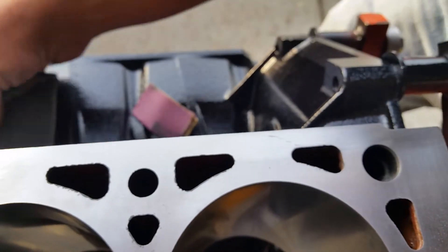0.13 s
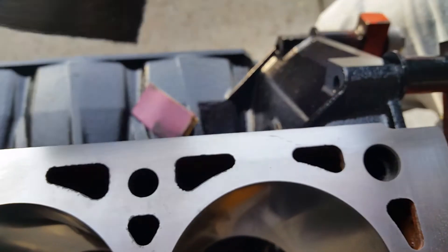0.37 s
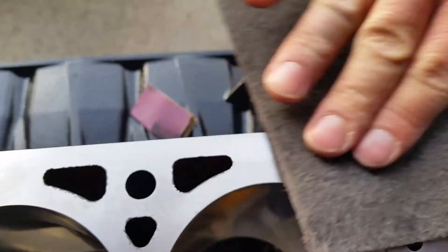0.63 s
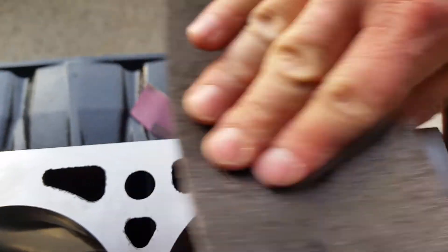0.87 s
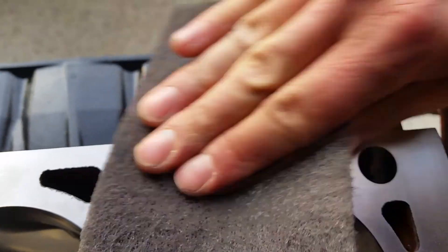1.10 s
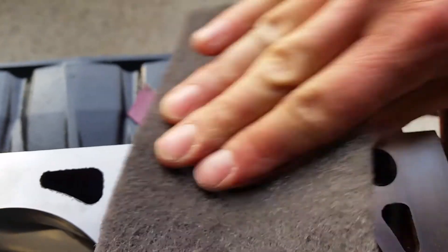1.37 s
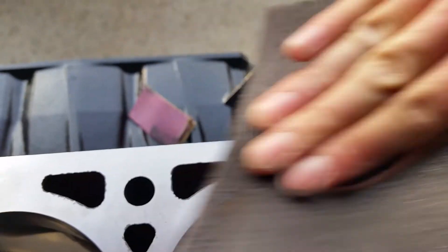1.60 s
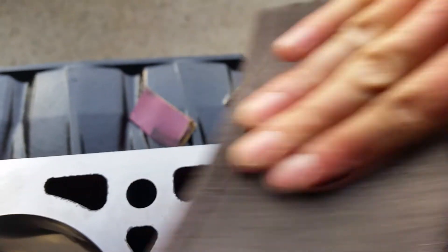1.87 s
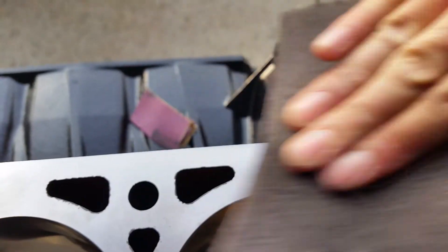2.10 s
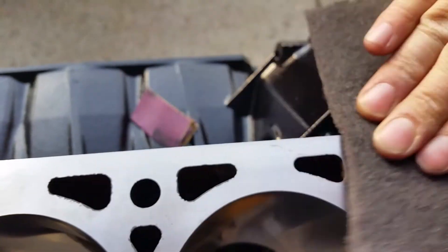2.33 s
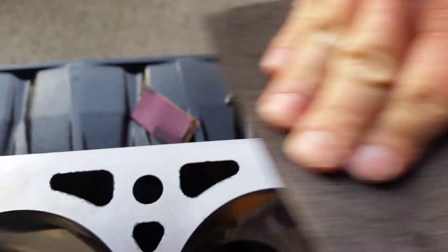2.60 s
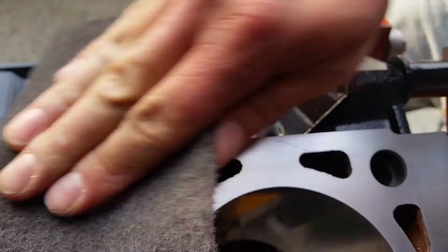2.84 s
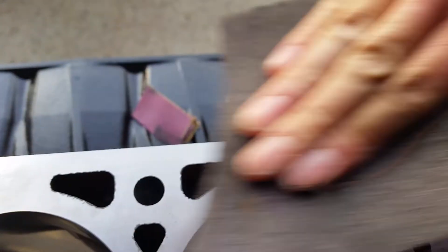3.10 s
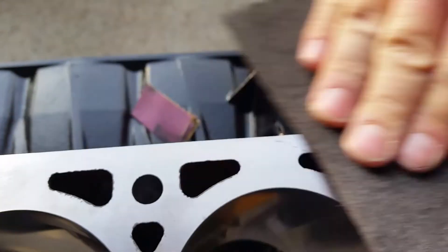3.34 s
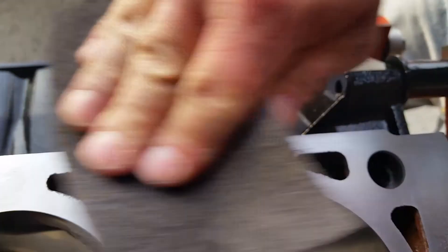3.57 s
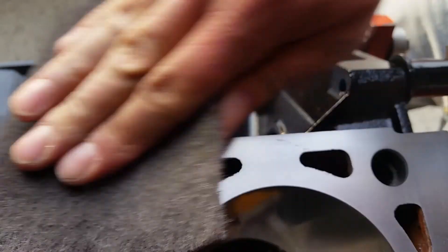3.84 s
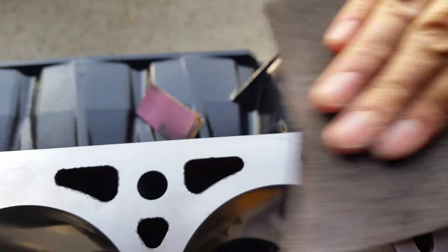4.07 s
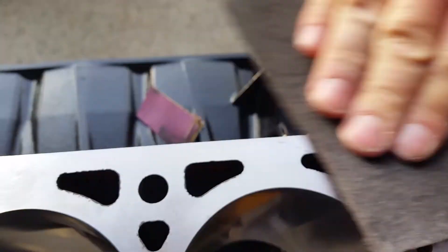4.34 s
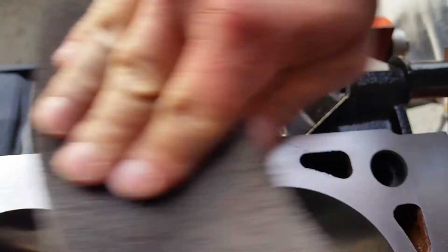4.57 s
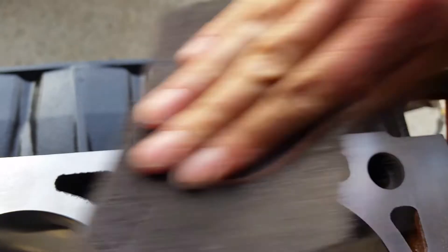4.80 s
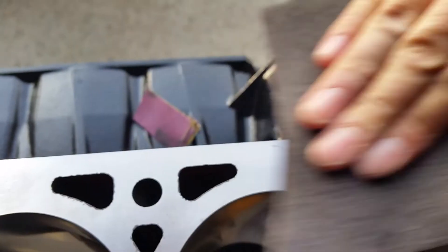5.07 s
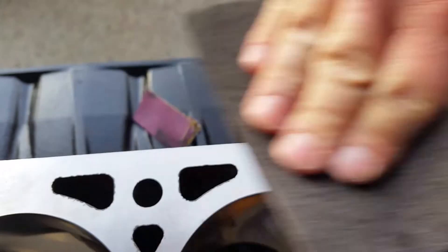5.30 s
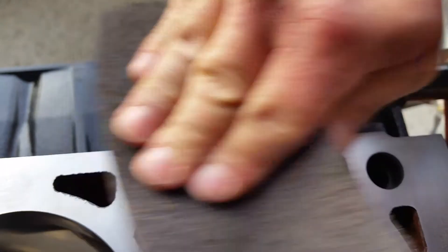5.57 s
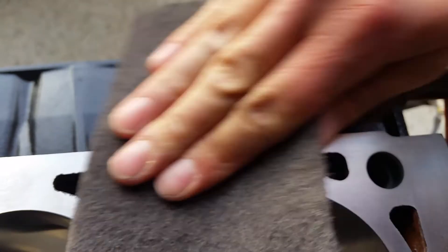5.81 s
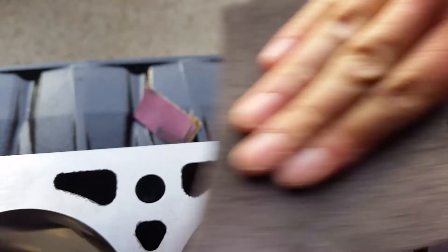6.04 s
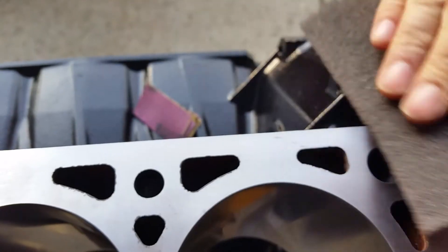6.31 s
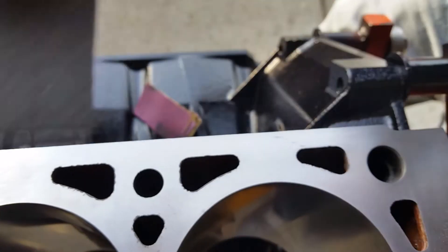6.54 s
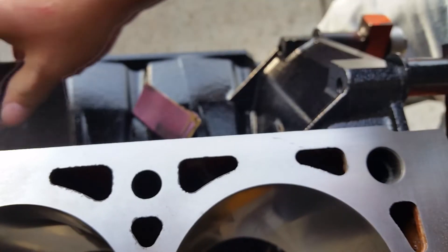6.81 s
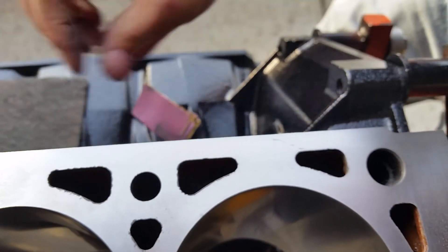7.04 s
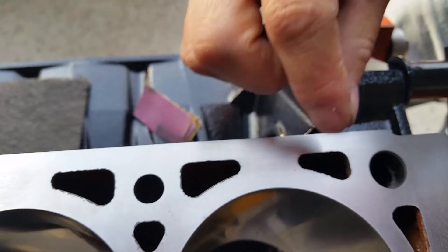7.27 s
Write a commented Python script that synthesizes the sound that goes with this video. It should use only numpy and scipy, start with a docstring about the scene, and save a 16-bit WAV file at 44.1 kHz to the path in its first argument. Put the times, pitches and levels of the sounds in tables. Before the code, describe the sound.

Close, dry stereo sound of hand sanding on metal in a workshop. A small part knocks and rattles first, then the pad starts gently and swells into steady, crisp back-and-forth scraping with a thin metallic ring, occasional sharp fibre snaps and short hollow resonances from openings. After nearly six seconds it lifts off, leaving light brushing, low rumble, soft hums and a faint hiss on the left.

```python
"""A soft low bump, a light brush and a metal clank come first, over the low rumble of a workshop.
Then a hand scrubs a fibre abrasive pad back and forth over the machined face of an engine block, up close.
Grit scratches brightly (shaped noise), the block rings under it (resonators driven by grit),
and an open bore booms as the pad crosses it (resonant air). Hums and a hiss on the left fill the workshop."""
import sys
import numpy as np
from scipy import signal
from scipy.fft import rfft, irfft
from scipy.io import wavfile
from scipy.ndimage import uniform_filter1d

SR = 44100
rng = np.random.default_rng(int(sys.argv[2]) if len(sys.argv) > 2 else 0)


def master_out(mix):
    """Clip the mix to full scale and print it as 16-bit PCM to the path in sys.argv[1]."""
    frames = np.transpose(np.atleast_2d(mix))
    ceiling = np.clip(frames, -1, 1)
    pcm = np.round(ceiling * 32767).astype(np.int16)
    wavfile.write(sys.argv[1], SR, pcm)


def invert_db(x):
    """Field ratio 10**(x/20) for x, a level in decibels (scalar or array-like)."""
    u = np.asarray(x, float) / 20
    return 10 ** u


N = 326719
T = np.arange(N) / SR
TOP_HZ = 15900  # upper end of the sound


def evened(x):
    """Scales to rms 1, over all channels together."""
    return x / np.sqrt(np.mean(x ** 2))


def read(points, hz):
    """Reads every column of a spectrum at hz, along a log frequency axis."""
    f, *columns = np.transpose(points)
    return np.array([np.interp(np.log(hz + 1), np.log(f + 1), c) for c in columns])


def wander(rate_hz, channels):
    """Slow chance of rms 1: noise smoothed down to rate_hz."""
    size = 2 ** 19
    spectrum = rfft(rng.standard_normal((channels, size)))
    spectrum = spectrum / (1 + (np.fft.rfftfreq(size, 1 / SR) / rate_hz) ** 2)
    return evened(irfft(spectrum)[:, :N])


def bumps(events, width_s):
    """Sums a smooth bump in dB at each (s, dB) event."""
    return sum(db * np.exp(-((T - s) / width_s) ** 2) for s, db in events)


def resonate(x, hz, width):
    """A fixed resonance of gain about 1 at its peak; width in Hz."""
    r = np.exp(-np.pi * width / SR)
    pole = r * np.exp(2j * np.pi * hz / SR)
    return 2 * signal.lfilter([1 - r], [1, -pole], x).real


def grit(spread_db, channels):
    """Dense scratches of random sign; a few grains bite harder."""
    bite = np.minimum(rng.exponential(1, (channels, N)), 5)
    return evened(rng.standard_normal((channels, N)) * invert_db(spread_db * bite))


def coloured(x, ears, patchy_db):
    """Colour at each microphone port, with patches that drift as the hand shades the sound."""
    hz, _, z = signal.stft(x, SR, nperseg=512)
    patches = uniform_filter1d(rng.standard_normal(z.shape), 8, axis=1)
    patches = evened(uniform_filter1d(patches, 8, axis=2))
    patches += patches[:1]  # partly shared by both ports
    colour = invert_db(read(ears, hz)) * (hz < TOP_HZ)
    z = z * colour[..., None] * invert_db(patchy_db * patches)
    return evened(signal.istft(z, SR, nperseg=512)[1][:, :N])


# The strokes of the pad from turn to turn, away and back alternately.
# Each row: start in seconds, scratch level early in the stroke in dB, scratch level late in dB, block ring in dB.
STROKE_ROWS = [(0.596, -44.5, -39.5, -53.5), (0.787, -38, -34.5, -48.5), (0.925, -33.5, -28.5, -44.5),
               (1.08, -31.5, -31, -43), (1.222, -31, -30, -41.5), (1.363, -31, -33.5, -41.5),
               (1.488, -32.5, -30.5, -42.5), (1.624, -31, -34, -42), (1.76, -33.5, -31, -43),
               (1.898, -29.5, -35.5, -43.5), (2.029, -32.5, -30.5, -41), (2.157, -33, -30, -44.5),
               (2.29, -30.5, -29.5, -41), (2.428, -30.5, -27.5, -39), (2.594, -27, -29.5, -38),
               (2.768, -36, -30, -43), (2.957, -29, -28, -40.5), (3.132, -29.5, -28, -40.5),
               (3.306, -29.5, -31.5, -40.5), (3.468, -30, -30, -44), (3.627, -32, -33.5, -47.5),
               (3.788, -32, -33.5, -47.5), (3.957, -34, -34, -51.5), (4.121, -34.5, -36, -47),
               (4.298, -33, -33.5, -46), (4.463, -31, -30, -42.5), (4.629, -29.5, -30.5, -42),
               (4.8, -32.5, -32, -46), (4.958, -29, -34.5, -45), (5.119, -30.5, -29.5, -41),
               (5.295, -31.5, -31, -43), (5.464, -31.5, -28, -41.5), (5.622, -30.5, -32, -42),
               (5.784, -32, -32, -43.5), (5.928, -33, -32, -43), (6.076, -32.5, -34, -48),
               (6.203, -32, -32.5, -43.5)]


def strokes():
    """Hand speed 0-1, zero at every turn; scratch, lean and ring in dB; nearness to the thin wall 0-1."""
    lift_s = 6.385  # the pad leaves the metal
    ease_s, ease_to_db = 0.068, -37  # the hand eases off before the lift
    set_off = 0.93  # below 1, the hand sets off faster than it slows
    ring_follows = 1  # dB of ring for each dB that the scratch swells within a stroke
    free_end_db = 0.5  # the block rings more toward one end of the travel
    lean_away_db, lean_back_db = -2.5, 0  # left minus right
    sag_at, sag_width = 0.53, 0.1  # shares of a stroke
    sag_away_db, sag_back_db, scratch_share = -4, -7, 0.33  # full sag is for the ring
    wall_away, wall_back, wall_width = 0.82, 0.22, 0.17  # shares of a stroke

    start, early_db, late_db, ring_db = np.transpose(STROKE_ROWS)
    turns = np.append(start, lift_s)
    length = np.diff(turns)
    travel = np.interp(T, turns, np.arange(len(turns)))
    done = travel % 1
    going = travel % 2 < 1
    speed = np.sin(np.pi * done ** set_off)

    away = np.arange(len(start)) % 2 == 0
    end_db = np.where(away, free_end_db, -free_end_db)
    swell_db = (ring_follows * (late_db - early_db) + end_db) / 2
    knots = np.ravel(start + np.outer([.3, .65], length), "F")  # early and late point of each stroke
    ease_db = np.interp(T, [lift_s - ease_s, lift_s], [0, ease_to_db])

    def glide(early, late):
        return ease_db + np.interp(T, knots, np.ravel([early, late], "F"))

    # the ring sags where the pad spans the open bore, and the scratch a little
    sag_db = np.where(going, sag_away_db, sag_back_db) * np.exp(-((done - sag_at) / sag_width) ** 2)
    scratch = glide(early_db, late_db) + scratch_share * sag_db
    ring = glide(ring_db - swell_db, ring_db + swell_db) + sag_db
    lean = np.interp(T, start + length / 2, np.where(away, lean_away_db, lean_back_db))
    wall = np.exp(-((done - np.where(going, wall_away, wall_back)) / wall_width) ** 2)
    return speed, scratch, lean, ring, wall


# The pad brushes lightly before and after the scrubbing.
# Each row: time in seconds, relative level in dB.
LIGHT_BRUSH = [(.125, -63), (.142, -56), (.165, -66.5), (.44, -61.5), (.47, -69), (.52, -70), (.528, -64.5),
               (6.33, -60.5), (6.53, -64.5), (6.58, -69.5), (6.85, -100)]
# The pad bites on a rim and the grit digs in for a moment.
# Each row: time in seconds, rise over the ring in dB.
RIM_BITES = [(.7, 10.5), (.853, 10.5), (1.691, 7), (2.798, 8.5), (2.899, 4.5), (4.355, 4), (4.57, 5),
             (4.679, 2), (5.343, 2)]


def scrub():
    """Fibres snag in short clumps; one hand motion drives the fibres, the block and the bore."""
    speed, scratch_db, lean_db, ring_db, wall = strokes()
    clumps_db = 1.5 * wander(400, channels=1)
    snags_db = clumps_db + 1.07 * wander(29, channels=1) + 0.64 * wander(33.8, channels=2)
    bites_db = bumps(RIM_BITES, width_s=0.02)
    touch_db = np.interp(T, *np.transpose(LIGHT_BRUSH)) + 0.53 * snags_db

    scratch_db = scratch_db + snags_db + 0.94 * bites_db + lean_db * [[.5], [-.5]]
    scratch = fibres(speed, scratch_db, touch_db)
    ring = block(speed, ring_db + bites_db + 0.69 * snags_db, touch_db, wall)
    return scratch + ring + bore(speed, ring_db, touch_db)


# A fibre catches on an edge and snaps free.
# Each row: time in seconds, rise over the scratch in dB.
FIBRE_SNAPS = [(.950, 10), (2.175, 1.5), (3.368, 8), (3.8142, 9), (4.1567, 15), (4.4757, 8), (4.984, 15),
               (5.414, 8), (5.7268, 6)]
# Colour at the microphone ports: first the spectrum of the block, then that of the fibres.
# Each row: frequency in Hz, relative left level in dB, relative right level in dB.
PORT_COLOURS = [
    [(310, -15.5, -20.5), (1050, -24, -20), (1380, -15.5, -23.5), (2690, -22, -22.5), (3470, -12, -14.5),
     (4020, -6, -25), (4930, -13.5, -17), (5460, -10, -30), (6850, -35.5, -30.5)],
    [(4930, -36.5, -57), (6360, -6, -12.5), (7580, 1.5, -29), (8610, -9, -8), (9600, -9, -11.5),
     (11130, -6.5, -3), (13200, -2.5, -4), (15160, -3, 2)],
]


def fibres(speed, scratch_db, touch_db):
    """Grit dragged by the fibres is bright noise whose level follows hand speed weakly."""
    snaps_db = bumps(FIBRE_SNAPS, width_s=0.00058)
    moving = np.tanh(3.3 * speed) ** 2.0  # soon full after each turn
    level = invert_db(scratch_db + snaps_db) * moving + invert_db(touch_db)
    return coloured(grit(0.45, channels=2), PORT_COLOURS[1], patchy_db=1.5) * level


# Modes of the block, lowest first.
# Each row: frequency in Hz, width in Hz, level in dB over the broad ring.
BLOCK_MODES = [(1217, 4.8, 16.5), (1858, 56, 5.5), (2035, 24, 3.5), (5200, 70, 2)]


def block(speed, ring_db, touch_db, wall):
    """Coarse grit shakes the modes of the block; the ring follows speed more than the scratch does."""
    grip = speed ** .75
    drive = grit(1.7, channels=2) * (invert_db(ring_db) * grip + invert_db(touch_db + 3))
    path_gap_s = 0.00005  # the block's sound reaches the right port this much earlier
    drive[1] += 0.27 * np.roll(drive[0], -round(path_gap_s * SR))  # the whole block radiates to both ports

    ring = drive
    damped_db = 2.5 * wander(8, channels=len(BLOCK_MODES))  # the hand frees or damps the upper modes as it moves
    for k, (hz, width, db) in enumerate(BLOCK_MODES[1:]):
        ring = ring + invert_db(db + damped_db[k]) * resonate(drive, hz, width)
    hz, width, db = BLOCK_MODES[0]
    # the lowest mode rocks: the ports hear opposite sides
    ring = ring + invert_db(db) * resonate(drive, hz, width) * [[1], [-1]]
    # the thin wall answers as the pad passes
    ring = ring + invert_db(-5) * wall * resonate(drive, hz=2000, width=800)
    return coloured(ring, PORT_COLOURS[0], patchy_db=1.5) * np.sqrt(np.mean(drive ** 2))


# The pad edge crosses a hole.
# Each row: time in seconds, relative level in dB.
HOLE_CROSSINGS = [(.59, -53), (.715, -45), (1.009, -35), (1.308, -31), (1.561, -37.5), (1.691, -44),
                  (1.844, -36), (2.1, -48), (2.321, -41), (2.636, -50), (2.703, -38.5), (3.416, -43),
                  (4.41, -43), (4.7, -47), (5.059, -44), (5.35, -42), (5.419, -40), (5.53, -69),
                  (5.733, -40), (6.027, -39.5), (6.241, -43), (6.289, -39)]
# Air in the half-covered holes.
# Each row: frequency in Hz, width in Hz, relative level in dB.
HOLE_AIR = [(525, 60, -2), (615, 90, 0), (770, 110, -4)]


def bore(speed, ring_db, touch_db):
    """Grit shakes the air in the holes: a share that follows the pad, a swell at each crossing."""
    under_pad = invert_db(ring_db - 7.5 + 2.7 * wander(20, channels=1)) * speed
    level = invert_db(touch_db - 5.5) + under_pad
    booms = sum(invert_db(db + 3.5) * np.exp(-((T - s) / 0.0089) ** 2) for s, db in HOLE_CROSSINGS)
    drive = rng.standard_normal((2, N))
    drive[1] = 0.72 * drive[0] + 0.46 * drive[1]  # the ports hear mostly the same air

    open_db = 3.73 * wander(12, channels=len(HOLE_AIR))  # the pad covers now one hole, now another
    air = 0
    for k, (hz, width, db) in enumerate(HOLE_AIR):
        air = air + (-1) ** k * invert_db(db + open_db[k]) * resonate(drive, hz, width)
    steady = resonate(level * evened(air), hz=566, width=600)

    hz, width = HOLE_AIR[1][0], 110  # a crossing sounds the middle hole alone
    crossing = resonate(booms * evened(resonate(drive, hz, width)), hz, width)
    return (steady + crossing) * invert_db([[1], [-6]])  # stronger on the left


# The part lands and bounces.
# Each row: seconds after the first blow, relative level in dB.
PART_BOUNCES = [(0, 0), (.007, -3), (.0185, -2)]
# Modes of the small metal part.
# Each row: frequency in Hz, relative level in dB, time to fall 60 dB in seconds.
PART_MODES = [(1147, -10, .6), (1270, -3, .045), (2220, -5, .11), (2040, -14, .25), (2116, -11, .3),
              (2326, -15, .22), (4800, -1, .05), (5141, 3, .06), (5450, -1, .04)]


def clank():
    """A small metal part knocks and bounces: bright cracks and a short rattle that shake its modes."""
    start_s, level_db = 0.1734, -29.5
    t = np.arange(SR // 2) / SR
    hits = sum(invert_db(db - 2.0 - 60 * np.maximum(t - s, 0) / 0.013) * (t >= s) for s, db in PART_BOUNCES)
    tails = invert_db(-7.5 - 60 * t / 0.074) + invert_db(-4.5 - 60 * t / 0.18)
    rattle = rng.standard_normal((2, len(t))) * (hits + tails)

    modes = sum(invert_db(db - 60 * t / t60) * np.sin(2 * np.pi * hz * t) for hz, db, t60 in PART_MODES)
    blows = 25 * np.diff(hits, prepend=0).clip(0)  # a click at each landing
    ring = signal.oaconvolve(rattle + blows, modes[None], axes=1)[:, :len(t)]
    ring = resonate(invert_db([[-35], [-41]]) * ring, hz=3900, width=4000)  # a small part radiates little bass
    crack = resonate(rattle, 13500, 3300) + resonate(rattle, 7800, 940) * invert_db([[3], [-15]])

    out = np.zeros((2, N))
    out[:, round(start_s * SR):][:, :len(t)] = invert_db(level_db) * (ring + crack)
    return out


# Low bumps.
# Each row: time in seconds, level in dB, frequency in Hz, left minus right in dB.
LOW_BUMPS = [(0.016, -50.5, 79, -37), (1.651, -38.5, 110, 5)]


def thumps():
    """Each bump is a cycle or two of low pressure."""
    out = np.zeros((2, N))
    for s, db, hz, lean in LOW_BUMPS:
        pulse = np.exp(-((T - s) * hz) ** 2) * np.sin(2 * np.pi * hz * (T - s))
        out += invert_db(db + lean * np.array([[.5], [-.5]])) * pulse
    return out


# Spectrum of the workshop air.
# Each row: frequency in Hz, relative left level in dB, relative right level in dB.
AIR_SPECTRUM = [(24.8, -9.5, -30.5), (49.6, -5.5, 2), (110, -1, -3), (416, -16.5, -16), (1230, -26, -34),
                (2290, -38.5, -36), (2660, -30.5, -38), (4194, -6, -74.5), (4930, -18, -55.5),
                (6540, -46, -56), (15000, -49, -43)]
# Likeness of the two ports.
# Each row: frequency in Hz, left-right correlation from -1 to 1.
PORT_LIKENESS = [(60, 1), (380, 0.43), (2380, -0.4), (15000, -0.081)]
# Loudness of the workshop air over time.
# Each row: time in seconds, level in dB.
AIR_LEVEL = [(0, -53), (.9, -52.5), (6.2, -51), (6.6, -55.5), (7, -58.5), (7.41, -60)]
# Hums, one table each.
# Each row: time in seconds, pitch in Hz, mean level in dB.
HUM_TRACKS = [
    [(0, 240.4, -63.5), (6.3, 239.3, -65), (7.41, 239.7, -78.5)],
    [(.55, 133.5, -59), (1.35, 135, -58), (1.55, 141, -79)],
    [(4.9, 107.5, -62), (6.45, 107, -55.5), (7.41, 106.3, -72.5)],
]


def workshop():
    """Noise with rumble alike at both ports and a hiss near 4 kHz on the left, and wavering sine hums."""
    hz, _, z = signal.stft(rng.standard_normal((2, N)), SR, nperseg=2048)
    same = np.clip(read(PORT_LIKENESS, hz)[0], -1, 1)[:, None]
    z[1] = same * z[0] + np.sqrt(1 - same ** 2) * z[1]
    z = z * invert_db(read(AIR_SPECTRUM, hz))[..., None]
    air = evened(signal.istft(z, SR, nperseg=2048)[1][:, :N])
    out = air * invert_db(np.interp(T, *np.transpose(AIR_LEVEL)))
    for rows in HUM_TRACKS:
        s, pitch_hz, db = np.transpose(rows)
        level_db = np.interp(T, s, db, -120, -120) + 3.8 * wander(5.36, channels=1)
        phase = 2 * np.pi * np.cumsum(np.interp(T, s, pitch_hz)) / SR
        out += invert_db(level_db) * np.sin(phase)
    return out


def room(x):
    """A short, weak tail of random reflections, falling 60 dB in 0.16 s."""
    t = np.arange(SR // 4) / SR
    tail = rng.standard_normal((2, len(t))) * invert_db(-60 * t / 0.16)
    tail = tail / np.linalg.norm(tail[0])
    return x + invert_db(-19.5) * signal.oaconvolve(x, tail, axes=1)[:, :N]


def scene():
    """Close sources through the room, over the bumps and the workshop air."""
    return room(scrub() + clank()) + thumps() + workshop()


def band_limit(x):
    """A steep low-pass at the top of the band."""
    return signal.sosfilt(signal.butter(12, 17100, fs=SR, output="sos"), x)


def record(dry):
    """A steep low-pass filter ends the band at TOP_HZ."""
    edge = signal.firwin(1023, TOP_HZ, window=("kaiser", 9), fs=SR)
    mix = signal.oaconvolve(dry, edge[None], "same", axes=1)
    return band_limit(mix)


dry = scene()
out = record(dry)
master_out(out)
```